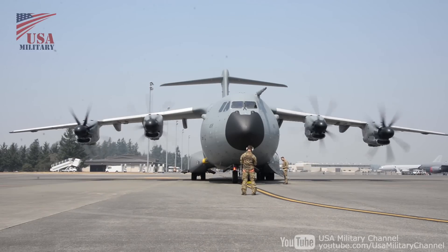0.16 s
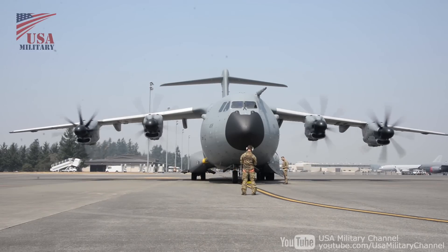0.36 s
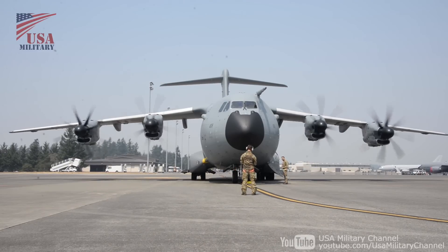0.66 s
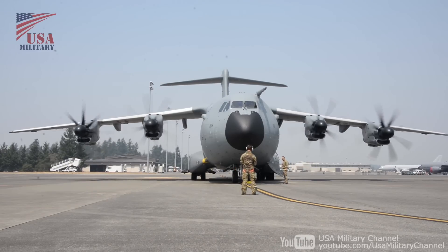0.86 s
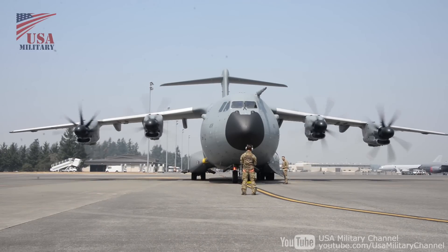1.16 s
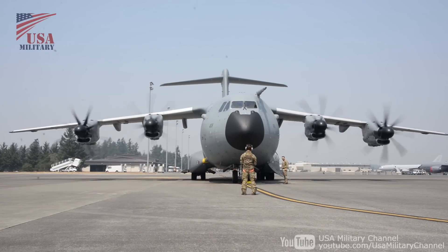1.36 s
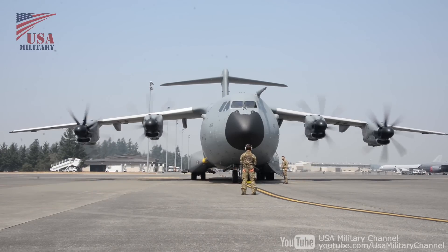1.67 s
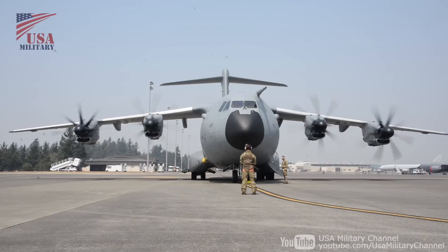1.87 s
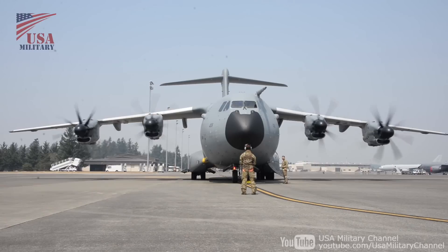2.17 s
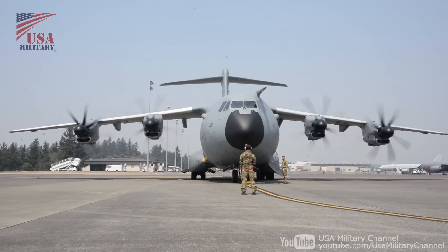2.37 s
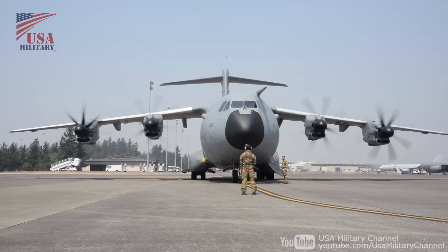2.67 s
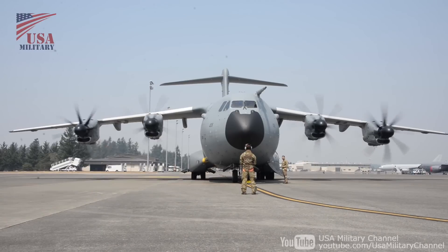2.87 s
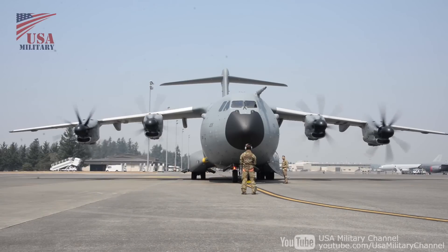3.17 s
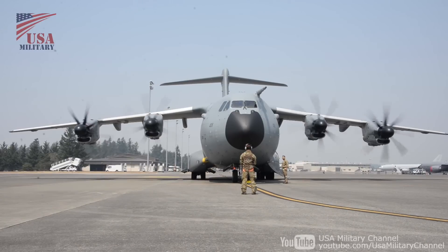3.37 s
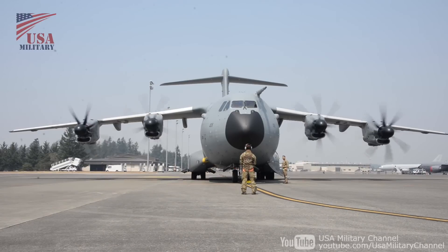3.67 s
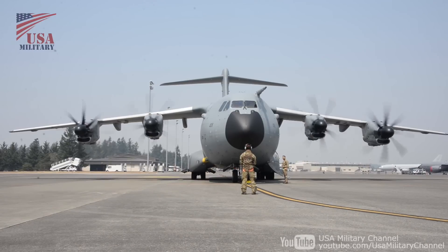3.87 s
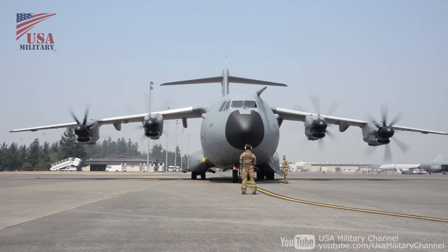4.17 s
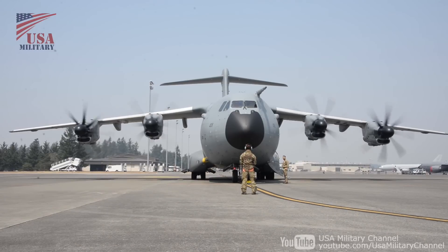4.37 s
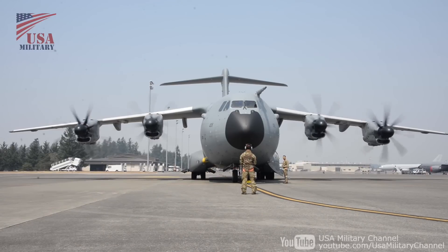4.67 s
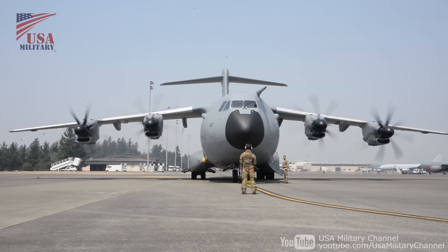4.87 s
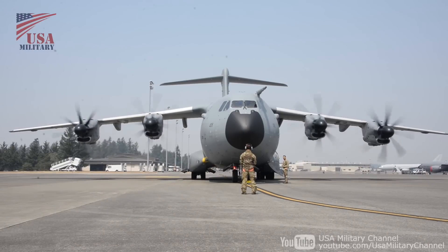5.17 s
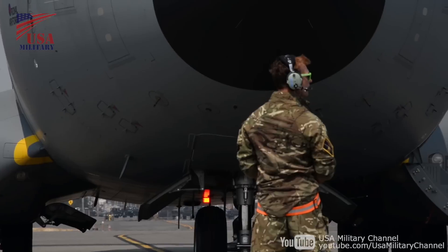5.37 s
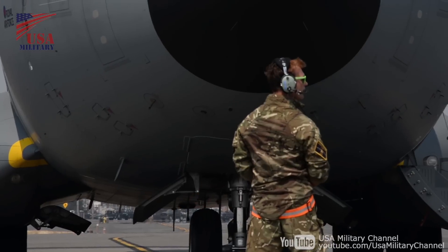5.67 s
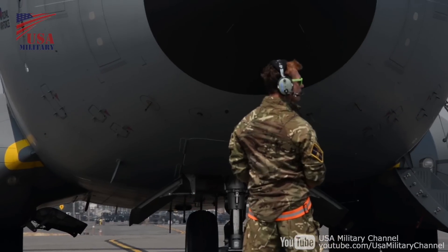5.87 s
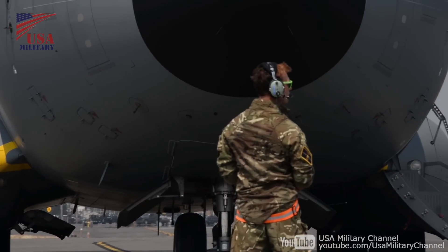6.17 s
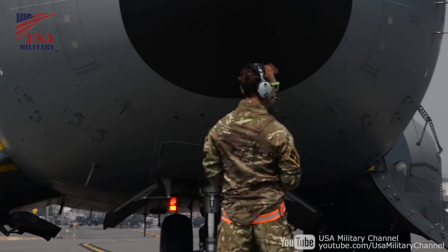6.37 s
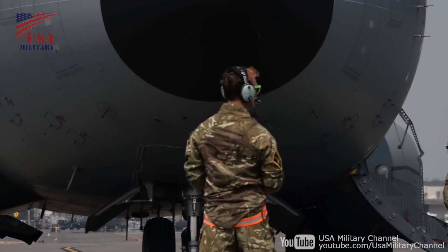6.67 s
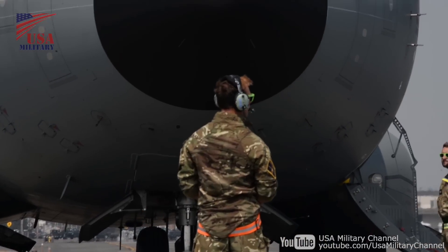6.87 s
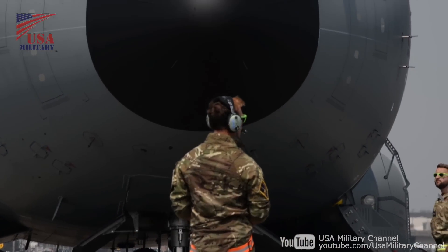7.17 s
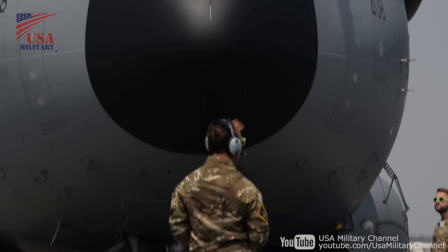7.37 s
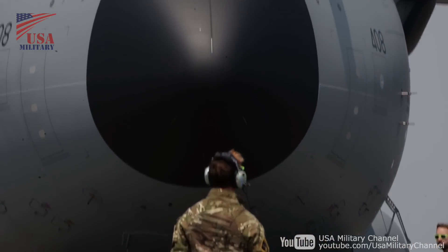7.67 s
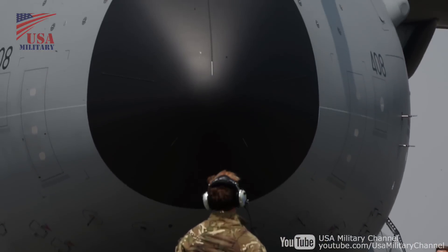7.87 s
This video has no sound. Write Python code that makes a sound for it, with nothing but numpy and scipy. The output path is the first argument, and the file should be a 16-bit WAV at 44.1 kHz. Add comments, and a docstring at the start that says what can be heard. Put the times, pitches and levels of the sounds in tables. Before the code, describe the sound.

From the start, a large four-engine turboprop aircraft idles on an open apron, heard from well in front. A loud, shrill cluster of turbine tones, strongest near 4.8 to 5 kHz, wavers, flutters and smears as though blown through hot turbulent air, with a broad breathy intake rush swelling alongside. Below are a steady bass rumble, a 30 Hz propeller drone that slowly weakens, and a moan near 500 Hz throbbing about twice a second. The whine dips around 2.6 and 3.5 seconds, returning strongly between. A thin whistle climbs from about 3 to 3.7 kHz, with a lower companion, and stops at 5.3 seconds. There the whine drops markedly, staying weak and more airy until about 6.5, then partly recovers around 7 to 7.6 before sinking at 8. A second gearbox tone rises slightly near the end. Engines are central; separate soft hiss fills left and right.

```python
"""Turbine tones of turboprops idling on an open apron, far in front: steady lines plus filtered noise make
them waver and smear, as hot, turbulent air scatters them. One engine's thin climbing tones stop at 5.33 s,
where the whine is weak. A broad intake rush, made of shaped noise, swells with the turbine tones.
Below lie gearbox moans, a drone built on multiples of 30 Hz, faint hums and a steady noise rumble.
The microphone adds separate hiss left and right."""
import sys
import numpy as np
from scipy import signal
from scipy.fft import rfft, irfft, next_fast_len
from scipy.io import wavfile

SR = 44100
rng = np.random.default_rng(int(sys.argv[2]) if len(sys.argv) > 2 else 0)


def transcribe(u):
    """Save the signal u as a 16-bit wav file named by the first command-line argument.

    u: samples, shape (n,) or (channels, n), limited to [-1, 1]; the rate is SR.
    q: integer samples, one column per channel.
    """
    v = np.clip(np.atleast_2d(u).T, -1, 1)
    q = np.round(v * 32767).astype(np.int16)
    wavfile.write(sys.argv[1], SR, q)


N = 354123
SLOW = 8  # slow envelopes have one point in this many samples


def undb(db):
    """Turn dB into a plain gain."""
    return 10 ** (np.asarray(db) / 20)


def unit(x):
    """Scale to an average strength (rms) of 1."""
    return x / np.sqrt(np.mean(np.abs(x) ** 2))


def curves(table):
    """Columns of a table after its time column, read at every sample."""
    s, *columns = np.transpose(table)
    return [np.interp(np.arange(N) / SR, s, c) for c in columns]


def coloured(points):
    """Noise whose spectrum follows (f/Hz, level/dB) points, rms 1."""
    hz, db = np.transpose(points)
    size = next_fast_len(N)
    bins_hz = np.fft.rfftfreq(size, 1 / SR)
    gain = undb(np.interp(np.log(bins_hz + 1), np.log(hz), db))  # +1 avoids log of zero
    spectrum = rfft(rng.standard_normal(size)) * gain
    return unit(irfft(spectrum, size)[:N])


def smooth(x, width_hz):
    """One-pole low-pass: keeps the slow movement, with long skirts in frequency."""
    pole = np.exp(-np.pi * width_hz * SLOW / SR)
    return signal.lfilter([1], [1, -pole], x)


def scatter(width_hz):
    """Slow complex noise, rms 1: it smears a tone over about width_hz."""
    size, lead = N // SLOW + 2, SR // SLOW // 2  # half a second of lead lets the filter settle
    noise = rng.standard_normal(size + lead) + 1j * rng.standard_normal(size + lead)
    return unit(smooth(noise, width_hz)[lead:])


def wavering(width_hz, share):
    """A steady part plus a smooth wandering part, so a tone varies in strength and phase."""
    return 1 + share * unit(smooth(scatter(width_hz), width_hz))


def spin(hz):
    """Phase turning at a fixed or moving frequency."""
    return np.exp(2j * np.pi * np.cumsum(hz * np.ones(N)) / SR)


def full_rate(envelope):
    """Read a slow envelope at every sample."""
    return np.interp(np.arange(N) / SLOW, np.arange(len(envelope)), envelope)


def tone(envelope, hz):
    """A slow envelope carried on a frequency, rms 1."""
    return unit((full_rate(envelope) * spin(hz)).real)


def fading(db, rate_hz):
    """A gain that wanders at random by about db."""
    slow = wavering(rate_hz, 1).real - 1
    return undb(db * full_rate(unit(slow)))


# Colour of the microphone hiss: (f/Hz, relative level/dB)
HISS_COLOUR = [(20, 1.5), (300, 1), (1000, -1.5), (2800, -4), (8000, -2), (12500, -2), (14500, -4),
               (15600, -10)]
HISS_DB = -29.2


def microphone_hiss():
    """The microphone's own shaped noise for one channel."""
    return undb(HISS_DB) * coloured(HISS_COLOUR)


# Colour of the steady rumble: (f/Hz, relative level/dB)
RUMBLE_COLOUR = [(15, -18), (30, -4), (80, 0), (200, -3), (500, -7), (1000, -10), (2500, -7), (6000, -10.5),
                 (11000, -14.5), (15000, -18)]
RUMBLE_DB = -28.5


def rumble():
    """Steady broad noise, strongest in the bass."""
    return undb(RUMBLE_DB) * coloured(RUMBLE_COLOUR)


# Faint low hums, each smeared over a width: (f/Hz, level/dB, width f/Hz)
LOW_HUMS = [(45, -49, 8), (150, -53, 3), (167, -51, 6), (180, -51, 3), (360, -55, 4), (521, -49, 6)]


def hums():
    """Wavering low tones, each a narrow band of noise."""
    return sum(undb(db) * tone(scatter(width_hz), hz) for hz, db, width_hz in LOW_HUMS)


DRONE_HZ, DRONE_MULTIPLES = 30.02, (1, 2, 3, 4, 8, 10)
# One row per drone multiple: (level/dB at the start, drift in dB per s, random waver share)
MULTIPLE_LEVELS = [(-35, -0.27, 0.032), (-36, -0.39, .12), (-43, -.4, 0.17), (-36, 0.05, .06),
                   (-46, -0.43, 0.28), (-43.5, -0.6, .12)]
# The fourth multiple sinks; the tenth throbs, then weakens:
# (t/s, level/dB added to the fourth, level/dB added to the tenth)
MULTIPLE_CHANGES = [(0, -.5, -8), (3.2, -.5, -1.5), (3.6, -4, 7), (3.85, -5.5, -15), (4.3, -11, 6),
                    (4.55, -9, -4), (5.15, -13, 7.5), (5.4, -5, -7), (6.1, -9, -4), (8.03, -13.5, -3)]


def drone():
    """Multiples of one low frequency add up to a pulse 30 times a second."""
    t = np.arange(N) / SR
    change_db = dict(zip((4, 10), curves(MULTIPLE_CHANGES)))
    out = 0
    for multiple, (start_db, per_s, share) in zip(DRONE_MULTIPLES, MULTIPLE_LEVELS):
        db = start_db + per_s * t + change_db.get(multiple, 0)
        out = out + undb(db) * tone(wavering(1.15, share), multiple * DRONE_HZ)
    return out


# A second gearbox, which dips in pitch and then speeds up late: (t/s, f/Hz, level/dB)
SECOND_GEARBOX = [(0, 482, -53), (4.5, 481, -53), (5.2, 472, -48), (5.7, 479, -46), (6.3, 481, -47),
                  (6.75, 485, -48), (7.1, 493, -50), (8.03, 497, -53)]


def second_gearbox():
    """A strongly wavering tone whose pitch follows the gearbox speed."""
    hz, db = curves(SECOND_GEARBOX)
    return undb(db) * tone(wavering(15.0, 0.94), hz)


# The gearbox moan throbs about twice a second: (t/s, level/dB)
MOAN_THROB = [(0, -42), (.2, -32), (.4, -47), (.67, -35), (.86, -45), (1.06, -35.5), (1.35, -40.5),
              (1.6, -53), (1.95, -42), (2.2, -47), (2.55, -42.5), (2.93, -50), (3.22, -38), (3.52, -45),
              (3.85, -38), (4.25, -42), (4.4, -53), (4.6, -39.5), (5., -45), (5.3, -37), (5.56, -50),
              (5.95, -38.5), (6.55, -49), (7.15, -42.5), (7.7, -45), (8.03, -39)]
MOAN_HZ, WAVER_HZ, WAVER_SHARE = 509, 10.3, 0.4


def gearbox_moan():
    """A tone at a fixed pitch that throbs and also wavers faster at random."""
    db = curves(MOAN_THROB)[0]
    return undb(db) * tone(wavering(WAVER_HZ, WAVER_SHARE), MOAN_HZ)


# Low shoulder of the rush, fuller after 5.3 s: (t/s, level/dB before flicker)
SHOULDER_LEVEL = [(0, -47), (1.3, -49), (2.7, -61), (3.8, -47), (5.3, -50), (5.36, -43), (5.75, -46),
                  (6.2, -36), (6.55, -42), (7.1, -38), (8.03, -46)]
SHOULDER_HZ, SHOULDER_WIDTH_HZ = 1840, 130
SHOULDER_FLICKER_DB = 2.5


def rush_shoulder():
    """A flickering band of noise below the intake rush."""
    flicker = fading(SHOULDER_FLICKER_DB, 9.8)
    band = tone(scatter(SHOULDER_WIDTH_HZ), SHOULDER_HZ)
    return undb(curves(SHOULDER_LEVEL)[0]) * flicker * band


# The air path lets the whine swell and sink; only the distance from each column's mean counts: (t/s, level/dB
# of the pair near 4.8 and 4.9 kHz, level/dB of the other high tones)
WHINE_SWELL = [(0.0, -16.5, -15.5), (0.48, -19.5, -19), (0.63, -21.5, -20.5), (1.14, -18, -18.5),
               (1.74, -19.5, -21.5), (1.92, -19.5, -21), (2.37, -23, -23.5), (2.61, -29.5, -27.5),
               (3.03, -21, -22.0), (3.45, -25, -18.5), (3.54, -29, -21), (3.87, -19.5, -19),
               (4.17, -21.5, -18.0), (4.83, -19.5, -18.5), (5.31, -24, -20), (5.34, -29, -30.5),
               (5.7, -34.5, -31), (5.82, -26, -31), (6.03, -30.0, -28), (6.36, -29, -27.5),
               (6.96, -25.5, -24), (7.65, -23, -26.0), (8.02, -30.5, -28.5)]


def swell():
    """How far the pair near 4.8 and 4.9 kHz and the other high tones stand above their means, in dB."""
    return [db - db.mean() for db in curves(WHINE_SWELL)]


# Colour of the intake noise: (f/Hz, relative level/dB)
INTAKE_COLOUR = [(1800, -19), (2600, -11), (3200, -5), (3700, -1.5), (4400, -2), (5300, 2.5), (5800, 5.5),
                 (6400, 0), (7600, -5), (9000, -8), (11000, -23)]
# Weak tones riding on the rush: (f/Hz)
FAINT_TONE_HZ = (2800, 3200, 3600, 5200, 5760, 7200, 8000, 9200)
# One row per weak tone: (level/dB against the noise slice below, width f/Hz)
FAINT_TONES = [(-10, 6), (-14, 8), (-20, 20), (-5, 50), (0, 90), (-10, 40), (-13, 40), (-14, 40)]
RUSH_DB, SLICE_HZ = -40, (4250, 4550)  # level of this slice of the noise at the mean swell
RUSH_SHARES = (0.25, 0.6)  # how much it follows the two swells


def intake_rush():
    """Broad noise and faint smeared tones that swell along with the whine."""
    db = RUSH_DB + np.dot(RUSH_SHARES, swell())
    broad = coloured(INTAKE_COLOUR)
    slice_filter = signal.butter(4, SLICE_HZ, "band", fs=SR, output="sos")
    slice_rms = np.std(signal.sosfilt(slice_filter, broad))
    faint = sum(undb(faint_db) * tone(scatter(width_hz), hz)
                for hz, (faint_db, width_hz) in zip(FAINT_TONE_HZ, FAINT_TONES))
    return undb(db) * (broad / slice_rms + faint)


# The compressor of one engine still spooling up: (t/s, f/Hz of the upper tone, level/dB of the upper tone)
SPOOL_UP = [(0, 3065, -44), (.35, 3095, -44), (.8, 3150, -46), (1.6, 3255, -54), (2.3, 3350, -41),
            (2.8, 3405, -44), (3.4, 3480, -44), (3.9, 3540, -46), (4.4, 3590, -43), (5.33, 3660, -48)]
SECOND_STAGE, SECOND_STAGE_DB = .715, -4  # frequency ratio and level against the upper tone
SPOOL_END_S = 5.33


def spooling_compressor():
    """Two thin tones climb together as one engine speeds up, then stop at once."""
    hz, db = curves(SPOOL_UP)
    upper = tone(wavering(33.0, 1.0), hz)
    lower = undb(SECOND_STAGE_DB) * tone(scatter(11.0), SECOND_STAGE * hz)
    audible = np.arange(N) < SPOOL_END_S * SR
    return undb(db) * (upper + lower) * audible


# Turbine tones from low to high: (f/Hz)
TURBINE_HZ = (2000, 4000, 4800.5, 4940, 5600, 6000, 6799.5)
# Make-up of each tone, levels against its main line: (wandering share, level/dB of a partner just above,
# level/dB of flutter sidebands, level/dB of the scattered skirt, skirt width f/Hz)
TURBINE_MAKEUP = [(.6, -10, -11, -5, 80), (1.5, -6, -12, 4.5, 130), (1.2, 1.5, -9, 3.5, 100),
                  (2., 0, -13, 5, 70), (1.3, 0, -6, 6, 130), (1.5, 1, -10, 6, 110), (1.3, 1, -8, 6, 130)]
# The lowest tone follows its own path: (t/s, level/dB before fading)
LOWEST_TONE = [(0.0, -30), (0.51, -37), (0.9, -32), (1.32, -41.5), (2.04, -38), (2.16, -56), (2.79, -41.5),
               (2.88, -35.5), (3.9, -36), (4.05, -38.5), (4.32, -32.5), (4.62, -36), (5.28, -35.5),
               (5.94, -37), (6.69, -28.5), (6.9, -38), (7.08, -30), (8.02, -37)]
# One row per upper tone: (level/dB at the mean of the swell before fading, share of the swell)
UPPER_TONES = [(-32, .85), (-23.5, 1.04), (-31.5, 1.01), (-28, 1.17), (-33, 1.26), (-29, 0.97)]
WHINE_PAIR = (1, 2)  # rows of UPPER_TONES, counted from 0
PARTNER_HZ, FLUTTER_HZ = 22, 23.6  # distances from the main line
FADE_DB, FADE_HZ = 1.04, 6.2  # every tone also fades at random


def turbines():
    """Each tone is a pair of wavering lines, flutter sidebands that come and go and a scattered skirt."""
    t = np.arange(N // SLOW + 2) * SLOW / SR
    partner = np.exp(2j * np.pi * PARTNER_HZ * t)
    step = np.exp(2j * np.pi * FLUTTER_HZ * t)  # dividing shifts down in pitch, multiplying up
    pair, other = swell()
    levels = curves(LOWEST_TONE)
    for row, (mean_db, swell_share) in enumerate(UPPER_TONES):
        levels.append(mean_db + swell_share * (pair if row in WHINE_PAIR else other))
    out = 0
    for hz, makeup, db in zip(TURBINE_HZ, TURBINE_MAKEUP, levels):
        share, partner_db, side_db, skirt_db, width_hz = makeup
        main_line = unit(wavering(11., share))
        partner_line = undb(partner_db) * partner * unit(wavering(11., share))
        below = scatter(6.) / step + .7 * scatter(6.) / step ** 2
        above = .9 * scatter(6.) * step ** 2
        sidebands = undb(side_db) * (below + above)
        skirt = undb(skirt_db) * scatter(width_hz)
        body = main_line + partner_line + sidebands + skirt
        out = out + undb(db) * fading(FADE_DB, FADE_HZ) * tone(body, hz)
    return out


def scene():
    """Add up all the sources; both channels get the same sound."""
    low = rumble() + hums() + drone() + second_gearbox() + gearbox_moan()
    high = rush_shoulder() + intake_rush() + spooling_compressor() + turbines()
    mixed = low + high
    return np.array([mixed, mixed])


TOP_HZ = 15730


def record(dry):
    """Add unrelated hiss to each channel, then cut the top steeply."""
    hiss = np.array([microphone_hiss() for _ in dry])
    cut = signal.ellip(14, .2, 100, TOP_HZ, fs=SR, output="sos")
    return signal.sosfilt(cut, dry + hiss)


dry = scene()
out = record(dry)
transcribe(out)
```